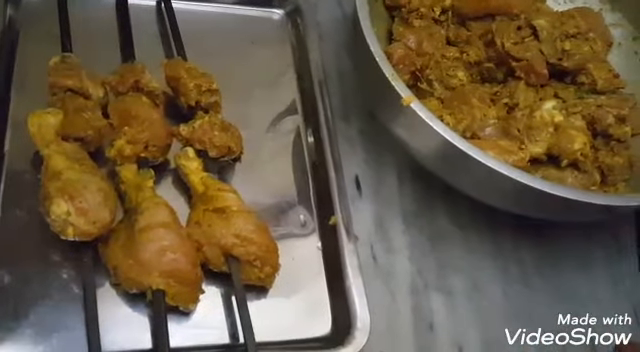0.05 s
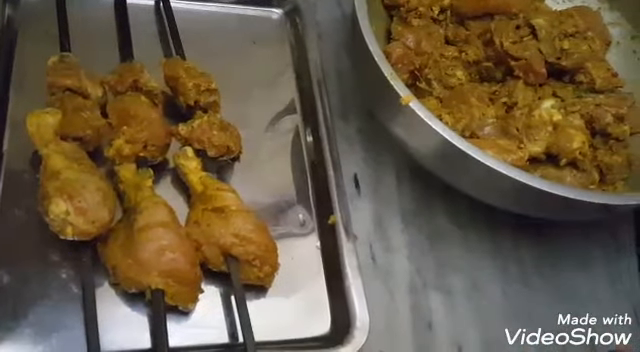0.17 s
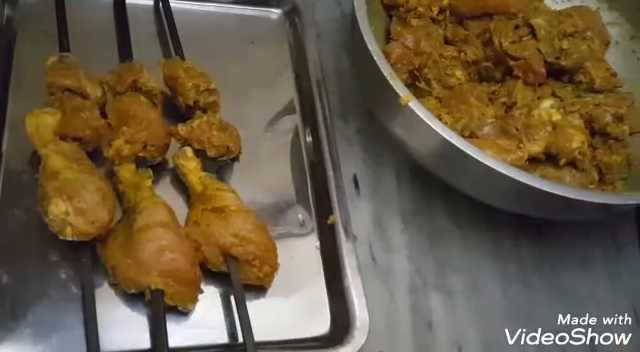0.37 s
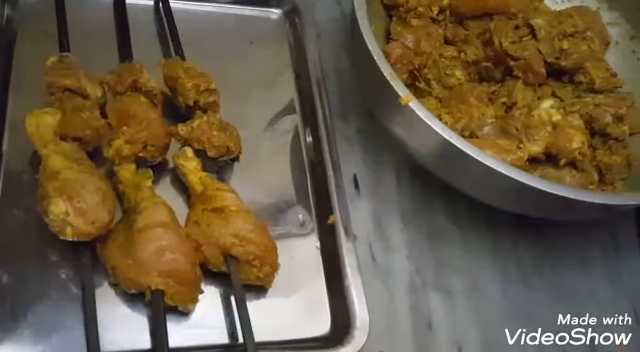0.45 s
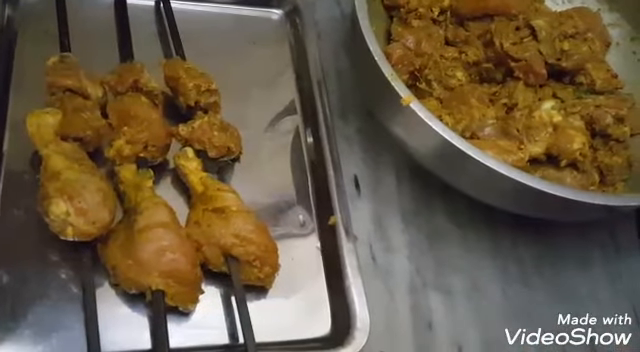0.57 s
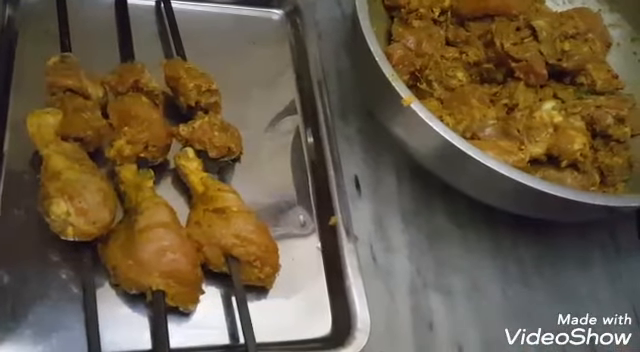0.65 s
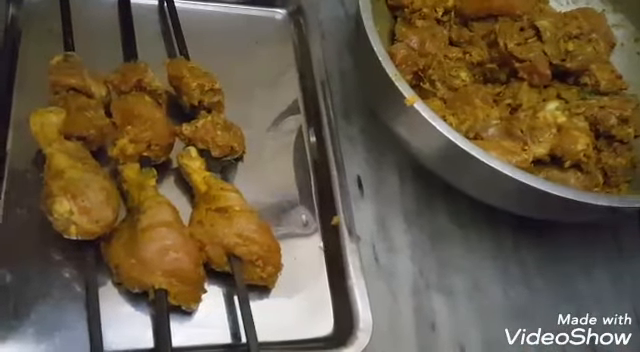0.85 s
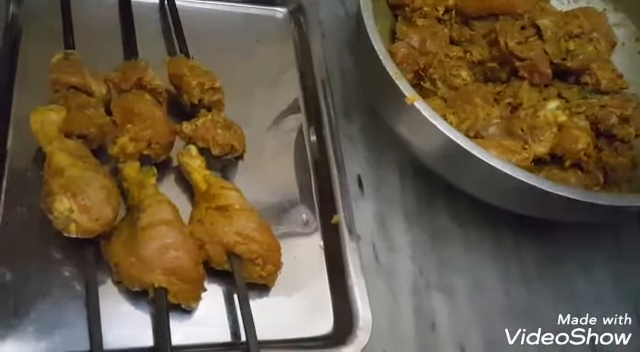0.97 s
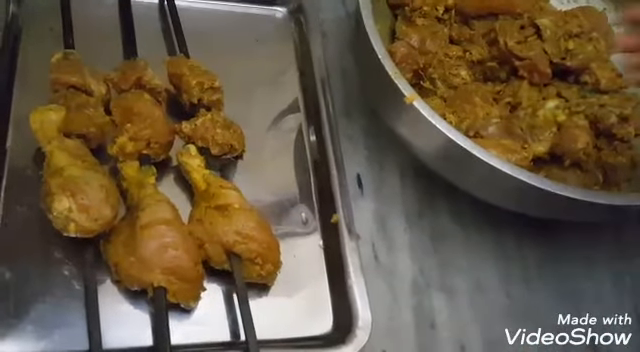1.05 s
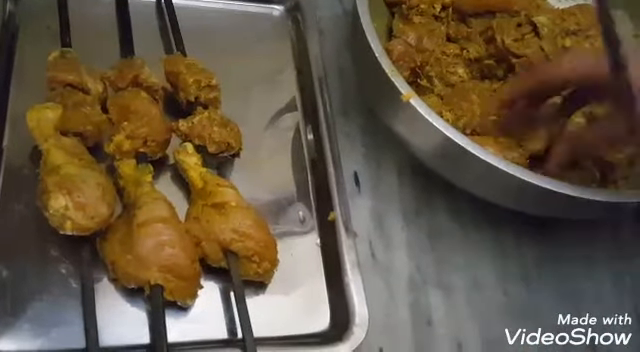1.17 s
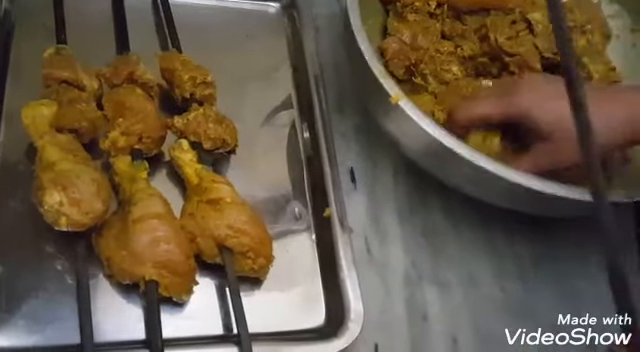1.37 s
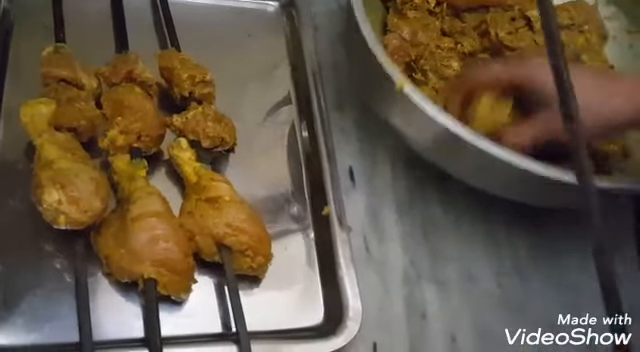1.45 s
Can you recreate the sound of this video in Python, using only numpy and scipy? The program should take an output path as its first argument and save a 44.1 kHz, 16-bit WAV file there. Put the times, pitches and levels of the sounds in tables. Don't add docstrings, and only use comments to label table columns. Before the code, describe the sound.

Steel rods ring together, a bundle bangs down hard beside a tray, then small ticks and rubbing

```python
import sys
import numpy as np
from scipy import signal
from scipy.fft import rfft, irfft, next_fast_len
from scipy.io import wavfile
from scipy.ndimage import uniform_filter1d

SR = 44100
rng = np.random.default_rng(int(sys.argv[2]) if len(sys.argv) > 2 else 0)


def ratio(d):
    e = np.asarray(d, float) / 20
    return 10 ** e


def unload_wav(signal):
    wavfile.write(
        sys.argv[1],
        SR,
        np.round(np.clip(np.atleast_2d(signal).T, -1, 1) * 32767).astype(np.int16),
    )


N = 66150
T = np.arange(N) / SR

# [t/s, level/dB before gain control, rattle/dB,
# swing/Hz (sign: push or pull first), room/dB]
BLOWS = [
    (0.567, -17, -3, -210, -1.4),
    (.6447, 2.5, -2.5, 295.5, -0.63),
    (1.493, -40.5, -17.5, 225.5, -2),
]
# [t/s, depth/dB, recovery/s]
DUCKS = [
    (.221, 3.5, 0.14),
    (0.638, 8.5, 0.11),
]
BOOM_HZ = [78, 98, 127, 156, 186, 215, 253, 282, 311, 336, 380, 434]
BOOM_LEVELS = [-22.5, -11, -3.5, -3.5, 0.5, -9.5, -6.5, -12.5, -5, -7.5, -18, -9]
# [f/Hz, density/dB]
SLIDE_TONE = [(88, -30), (150, -12), (457, -7), (675, -16), (941, -2.5), (2060, -15.5), (3770, -17),
              (8560, -11), (16000, -25)]
# [f/Hz, width/Hz, level/dB]
RUBBED = [(430, 150, -2.5), (933, 14, 5), (990, 30, 0.5), (2036, 260, 16), (2500, 220, 8.5)]
FLUTTER_DB = 4


def unit(x):
    return x / np.sqrt(np.mean(x ** 2) + 1e-20)


def along(points, hz):
    f, v = np.transpose(points)
    return np.interp(np.log(hz + 1), np.log(f + 1), v)


def filtered(x, response):
    m = next_fast_len(x.shape[-1] + 8192)
    return irfft(rfft(x, m) * response(np.fft.rfftfreq(m, 1 / SR)), m)[..., :x.shape[-1]]


def noise(spectrum, size=N):
    return unit(filtered(rng.standard_normal(size), lambda hz: ratio(along(spectrum, hz))))


def resonances(peaks, f):
    return sum(ratio(db) * 1j * f * width / (hz * hz - f * f + 1j * f * width) for hz, width, db in peaks)


def pair(two):
    # [f/Hz, correlation]
    likeness = [(30, 0.74), (100, .97), (300, 0.89), (600, 0.68), (1200, -0.15), (5000, 0.053)]

    def mid_and_side(hz):
        angle = np.arccos(np.clip(along(likeness, hz), -1, 1)) / 2
        return np.array([np.cos(angle), np.sin(angle)])

    mid, side = filtered(two, mid_and_side)
    return np.array([mid + side, mid - side])


def ring(modes, t, scatter_db, flutter_db=0):
    hz, db, t60 = np.transpose(modes)[:, :, None]
    chance = rng.standard_normal((2, len(modes), 1))
    knot_s = .012
    knots = rng.standard_normal((len(modes), int(t[-1] / knot_s) + 2))
    flutter = np.array([np.interp(t / knot_s, np.arange(len(row)), row) for row in knots])
    level_db = db + scatter_db * chance[0] + flutter_db * flutter - 60 * t / t60
    phase = 2 * chance[1] + flutter_db / 8 * flutter[::-1]
    return np.sum(ratio(level_db) * np.sin(2 * np.pi * hz * t + phase), axis=0)


def add(track, s, sound):
    part = track[round(s * SR):][:len(sound)]
    part += sound[:len(part)]


def kitchen(x, wet_db):
    # [f/Hz, t60/s]
    room_t60 = [(100, 0.49), (400, 0.55), (1500, 0.47), (5000, 0.38), (14000, 0.22)]
    lag_s, wall_s, low_cut_hz = 0.0001774, 0.0044, 95
    hz, t, z = signal.stft(rng.standard_normal((2, SR)), SR, nperseg=256)
    dying = z * ratio(-60 * t / along(room_t60, hz)[:, None])
    tail = pair(signal.istft(dying, SR, nperseg=256)[1])
    tail = np.pad(tail / np.linalg.norm(tail[0]), ((0, 0), (round(wall_s * SR), 0)))
    x = filtered(x, lambda f: (1j * f / (low_cut_hz + 1j * f)) ** 3)
    direct = filtered(x, lambda f: np.exp(1j * np.pi * lag_s * np.outer([-1, 1], f)))
    return direct + ratio(wet_db) * signal.fftconvolve(x[None], tail, axes=1)[:, :N]


def air():
    # [f/Hz, density/dB]
    air_tone = [(15, -50.5), (25, -21), (58, -11.5), (134, -5.5), (489, -18), (1260, -26.5), (1400, -26),
                (6560, -46), (16000, -42)]
    waves = [(hz, 12, db) for hz, db in zip(BOOM_HZ, BOOM_LEVELS)]
    tone = pair(np.array([noise(air_tone), noise(air_tone)]))
    return ratio(-55.5) * unit(filtered(tone, lambda f: 1 + 0.51 * resonances(waves, f)))


def friction(stroke, tone, peaks, peaks_db):
    s, db = np.transpose(stroke)
    grit = .35
    grains = rng.standard_normal(N) * np.exp(grit * unit(uniform_filter1d(rng.standard_normal(N), size=60)))
    body = lambda f: ratio(along(tone, f)) * (1 + ratio(peaks_db) * resonances(peaks, f))
    return ratio(np.interp(T, s, db, left=-120, right=-120)) * unit(filtered(grains, body))


def slide_in():
    # [t/s, friction/dB]
    slide_stroke = [(0.02, -56), (0.026, -46), (0.058, -32), (0.072, -54), (0.175, -62)]
    return friction(slide_stroke, SLIDE_TONE, RUBBED, peaks_db=-3)


def lift():
    # [t/s, friction/dB]
    lift_stroke = [(0.175, -59), (.19, -51.5), (.196, -38), (0.206, -34), (0.223, -41.5), (0.228, -28)]
    return friction(lift_stroke, SLIDE_TONE, RUBBED, peaks_db=2)


def standing_waves(s, db):
    boom, t = np.zeros((2, N)), T[:SR * 3 // 4]
    modes = [(hz, level_db, 0.47) for hz, level_db in zip(BOOM_HZ, BOOM_LEVELS)]
    for row, row_db in zip(boom, [0, -16.5]):
        waves = ring(modes, t, scatter_db=3)
        add(row, s, ratio(db + row_db) * (1 - np.exp(-t / 0.011)) * waves)
    return boom[0] + np.outer([1, -1], boom[1])


def clashes():
    # [t/s, level/dB before gain control, brightness/dB per octave, crack/dB]
    clash_events = [
        (.230, -8, 6.5, -0.5),
        (.240, -17, -6, -7.5),
        (.273, -13, -0.5, -1),
        (.2765, -16, -13, 2),
        (.287, -19.5, -2, -2),
        (0.567, -34, -6, 7),
        (.648, -26.5, -7.5, -9),
    ]
    rod_hz = [3552, 4516, 5055, 5577, 6590, 6730, 6889, 7796, 7893, 7969, 9021, 9087, 10373, 11740]
    rod_top_hz = [11350, 12543, 13150, 13390, 13859, 14745, 15234]
    rod_db = [-19.5, -18.5, -22.5, -18, -8, -9, -14.5, -8, -7, -12, -3.5, -10.5, -16, -6, -21.5, -11.5, -14,
              -11.5, -21, -9, -17]
    rod_t60 = [0.27, 0.44, 0.38, 0.35, 0.16, 0.35, 0.17, .2, 0.32, 0.16, 0.13, .18, 0.32, 0.098, 0.38, 0.18,
               0.11, 0.18, 0.2, 0.15, 0.17]
    # [f/Hz, density/dB]
    crack_tone = [(60, -43), (150, -5.5), (440, -2.5), (700, -8), (2110, -1), (3760, -9.5), (5950, -14),
                  (7950, -3), (14200, -23), (16000, -41.5)]
    # [f/Hz, density/dB]
    wash_tone = [(2500, -30.5), (4000, -4), (8000, -9.5), (9300, -2.5), (9700, -25), (10200, -5.5),
                 (12000, -5.5), (15000, -13), (15600, -44.5)]

    out, t = np.zeros(N), T[:SR * 3 // 8]
    modes = np.transpose([np.concatenate([rod_hz, rod_top_hz]), rod_db, rod_t60])
    neighbours = np.tile(modes * [1, 1, 0.58] + [0, -3.5, 0], (3, 1))
    neighbours[:, 0] *= 1 + 0.011 * rng.standard_normal(len(neighbours))
    neighbours[:, 1] -= 3.5 * (neighbours[:, 0] < 6000)
    for s, db, tilt, crack_db in clash_events:
        landed = s > .5
        bundle = np.vstack([modes, neighbours])
        bundle[:, 2] *= .4 if landed else 1
        bundle[:, 1] += tilt * np.log2(bundle[:, 0] / 7000)
        wash_t60 = 0.37 * (.2 if landed else 1)
        crack = ratio(11.5 + crack_db - 60 * t / 0.022) * noise(crack_tone, size=len(t))
        wash = ratio(-10 - 60 * t / wash_t60) * noise(wash_tone, size=len(t))
        struck = ring(bundle, t, scatter_db=5, flutter_db=FLUTTER_DB) + crack + wash
        add(out, s, ratio(db - 10) * struck * (1 - np.exp(-t / 0.000054)))
    first_s, first_db = clash_events[0][:2]
    return kitchen(out, wet_db=2) + standing_waves(first_s, first_db - 23)


def jolt():
    # [t/s, level/dB, f/Hz]
    jolt_event = (.232, -34, 68)
    s, db, hz = jolt_event
    out, t = np.zeros(N), T[:SR // 2]
    hump = np.sin(np.pi * np.clip(t / 0.023, 0, 1)) ** 2
    add(out, s, ratio(db) * np.sin(2 * np.pi * hz * t) * hump)
    return out


def clear_rods():
    # [f/Hz, level/dB, t60/s]
    free_rod = [(3580, -7.5, .6), (4516, 4.5, 0.63), (6731, 3, 0.26), (8020, -1.5, 0.38), (9510, 3.5, 0.27),
                (10373, -6.5, .45), (11900, 2.5, .15), (12543, -3, .5), (13300, 2.5, .12),
                (13859, -6.5, .4), (14745, -1.5, .4), (15234, 1, 0.29)]
    # [t/s, level/dB]
    free_struck = (.234, -26.5)
    # [f/Hz, level/dB, t60/s]
    landed_rod = [(10290, -3.5, 0.34), (11400, 0.5, 0.39), (12150, -2.5, 0.25), (13000, 0.5, 0.26),
                  (14700, 0.5, .08)]
    # [t/s, level/dB before gain control]
    landed_struck = (.650, -39)
    out, t = np.zeros((2, N)), T[:SR * 3 // 8]
    for modes, (s, db) in [(free_rod, free_struck), (landed_rod, landed_struck)]:
        for row in out:
            rod = ring(modes, t, scatter_db=3, flutter_db=1.5)
            add(row, s, ratio(db) * (1 - np.exp(-t / .004)) * rod)
    return out


def swing_of(swing_hz, t):
    cycles = 2.5
    hump = np.sin(np.pi * np.clip(t * abs(swing_hz) / cycles, 0, 1)) ** 2
    return -hump * np.sin(2 * np.pi * swing_hz * t)


def blows():
    # [f/Hz, density/dB]
    rattle_tone = [(180, -40), (300, -12.5), (713, -7.5), (1100, -10.5), (1530, -11), (2840, -18.5),
                   (4000, -13.5), (9400, -24.5), (10000, -38), (13000, -57), (16000, -86.5)]
    tray_hz = [555, 610, 675, 739, 835, 900, 968, 1100, 1152, 1292, 1501, 1578, 1846, 2137]
    tray_levels = [-14.5, -16.5, 3.5, 5, -3.5, -6, -6.5, -12, -9.5, -3.5, 2, 0, -4, -5]
    # [f/Hz, density/dB]
    clatter_tone = [(300, -16.5), (500, -3), (800, -1.5), (1300, -5), (1600, -1), (1850, -2), (2000, -15),
                    (9500, -28), (10000, -55.5)]

    out, t = np.zeros((2, N)), T[:SR // 2]
    tray_modes = [(hz, db, 0.16) for hz, db in zip(tray_hz, tray_levels)]
    rise = 1 - np.exp(-(t / 0.0024) ** 2)
    hardest = max(row[1] for row in BLOWS)
    for s, db, rattle_db, swing_hz, wet_db in BLOWS:
        soft = db < hardest
        body, snap, clatter = np.zeros(N), np.zeros(N), np.zeros((2, N))

        tray = ring(tray_modes, t, scatter_db=1, flutter_db=FLUTTER_DB)
        rattle = ratio(-60 * t / 0.059) * noise(rattle_tone, size=len(t)) + ratio(-19) * tray
        if soft:
            rattle = filtered(rattle, lambda f: 1 / (1 + 1j * f / 3300))
        add(body, s, ratio(db) * (swing_of(swing_hz, t) + ratio(rattle_db) * rise * rattle))

        snap_db = db + rattle_db - 8 - 11 * soft
        add(snap, s, ratio(snap_db - 60 * t / 0.03) * rise * rng.standard_normal(len(t)))

        clatter_db = db + rattle_db - 10 + 1.5 * soft
        for row in clatter:
            add(row, s, ratio(clatter_db - 60 * t / 0.39) * rise * noise(clatter_tone, size=len(t)))

        out += kitchen(snap, wet_db=-22) + pair(clatter) + kitchen(body, wet_db)
        out += standing_waves(s, db - 15.5 + 5 * soft)
    return out


def near_swings():
    near_swing_db = [-15, -11, -48]
    out = np.zeros(N)
    for (s, _, _, swing_hz, _), near_db in zip(BLOWS, near_swing_db):
        ducked_db = sum(depth for at, depth, _ in DUCKS if 0 < s - at < .01)
        add(out, s, ratio(near_db + ducked_db) * swing_of(swing_hz, T[:SR // 10]))
    return out


def lone_tick():
    # [t/s, level/dB]
    tick_event = (1.087, -34.5)
    lone_low_hz = [2000, 2150, 2650, 2950, 3330, 3540, 4470, 4900, 5250, 5560]
    lone_hz = [6660, 7820, 9040, 10430, 11780, 12440, 13310, 14900, 15530, 15740]
    lone_db = [-9, -10.5, -17, -17, -20, -13, -26.5, -23, -33, -14, 3.5, -6.5, 2.5, 1.5, -7, -5, 6, 3, -1,
               -8]
    lone_t60 = [0.038, 0.06, 0.045, .04, 0.058, .05, .2, .02, 0.024, .05, .03, 0.04, 0.029, 0.05, 0.021,
                .04, 0.019, 0.021, 0.057, .04]
    out, t = np.zeros(N), T[:SR // 4]
    s, db = tick_event
    modes = np.transpose([np.concatenate([lone_low_hz, lone_hz]), lone_db, lone_t60])
    rod = ring(modes, t, scatter_db=-0.5) * (1 + 0.5 * np.exp(-t / 0.0038))
    contact = 0.64 * ratio(-60 * t / 0.034) * rng.standard_normal(len(t))
    add(out, s, ratio(db - 6) * (1 - np.exp(-t / 0.00054)) * (rod + contact))
    return out


def shuffle():
    # [t/s, friction/dB]
    shuffle_stroke = [(1.27, -82), (1.288, -81), (1.294, -54), (1.34, -58.5), (1.364, -63.5), (1.376, -85),
                      (1.432, -64), (1.436, -65), (1.5, -54)]
    # [f/Hz, density/dB]
    shuffle_tone = [(240, -24), (400, -4), (921, -12), (1160, -10.5), (1630, -8.5), (2300, -8.5),
                    (3580, -21), (6150, -16.5), (16000, -28.5)]
    # [f/Hz, width/Hz, level/dB]
    scraped = [(380, 79, 0.5), (850, 110, -3), (1120, 77, -1), (1720, 60, -11), (2130, 140, -6.5),
               (2345, 100, -9.5)]
    return friction(shuffle_stroke, shuffle_tone, scraped, peaks_db=14)


def specks():
    # [t/s, level/dB, f/Hz]
    speck_events = [
        (1.395, -56, 13400),
        (1.421, -53, 6370),
    ]
    out, t = np.zeros(N), T[:SR // 4]
    width = 0.32
    for s, db, hz in speck_events:
        low_hz, high_hz = hz * (1 - width), hz * (1 + width)
        burst = noise([(low_hz * .8, -40), (low_hz, -6), (hz, 0), (high_hz, -20)], size=len(t))
        add(out, s, ratio(db - 60 * t / 0.0125) * burst)
    return out


def scene():
    loud_sounds = clashes() + blows() + jolt() + near_swings()
    handling = slide_in() + shuffle() + lift() + lone_tick()
    clicks = specks()
    small_sounds = kitchen(handling, wet_db=-2) + kitchen(clicks, wet_db=-14)
    return loud_sounds + small_sounds + air() + clear_rods()


def band_limit(x):
    return signal.sosfilt(signal.butter(12, 16540, fs=SR, output="sos"), x)


def record(dry):
    colour_hz = [9100, 9700, 10200, 15000, 15450, 16500]
    colour_db = [-1, -4.5, -4, 0.5, -18, -30.5]
    # [f/Hz, level/dB]
    port_lean = [(200, -1.1), (700, 0), (1500, -2.5), (3000, -6.5), (6000, -5), (10000, 4)]
    overshoot_db = [11, 15]
    overshoot_s = [.003, .006]

    colour = np.transpose([colour_hz, colour_db])
    ports = filtered(dry, lambda hz: ratio(along(colour, hz) + np.outer([.5, -.5], along(port_lean, hz))))
    duck_db = 6 * np.clip(1 - T / 0.056, 0, 1)
    for (s, db, back), over_db, over_s in zip(DUCKS, overshoot_db, overshoot_s):
        since = T - s
        climb = db * np.clip(1 - since / back, 0, 1)
        overshoot = over_db * np.clip(1 - (since / over_s) ** 2, 0, 1)
        duck_db = duck_db + np.clip(since / .0012, 0, 1) * (climb + overshoot)
    held = ports * ratio(-duck_db)
    ceiling = .95
    held = held / (1 + np.abs(held / ceiling) ** 6) ** (1 / 6)
    return band_limit(held)


dry = scene()
out = record(dry)
unload_wav(out)
```